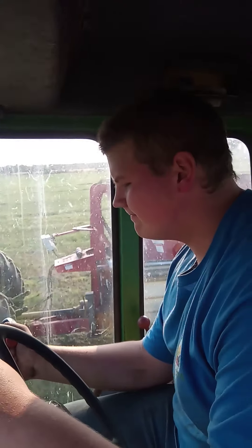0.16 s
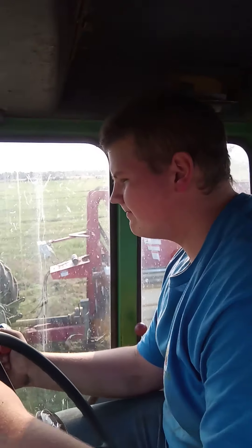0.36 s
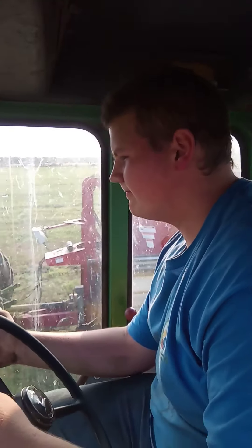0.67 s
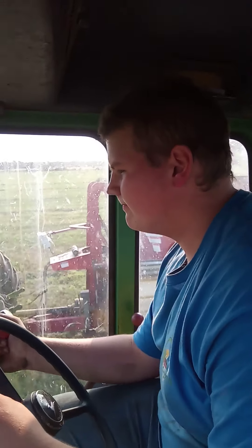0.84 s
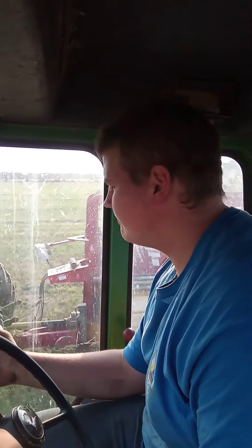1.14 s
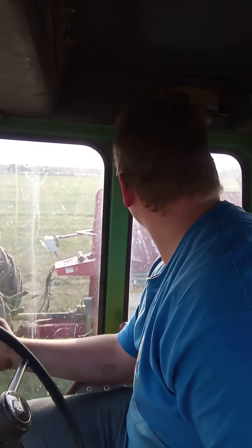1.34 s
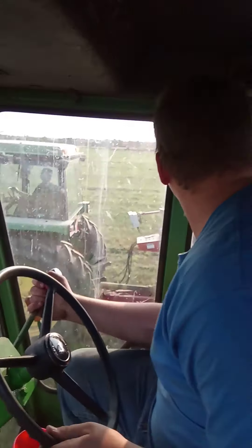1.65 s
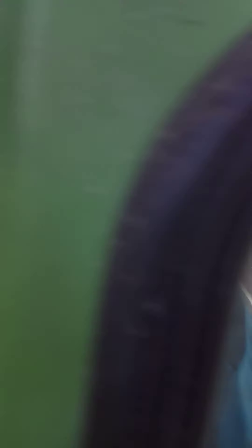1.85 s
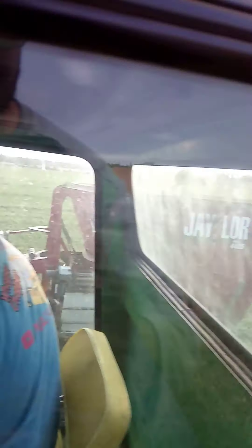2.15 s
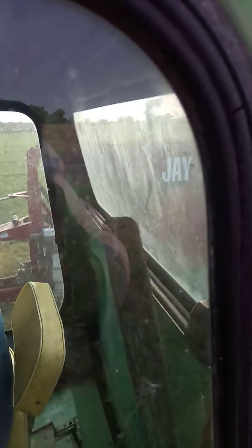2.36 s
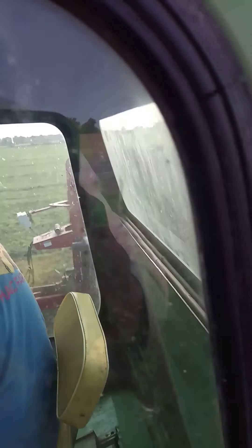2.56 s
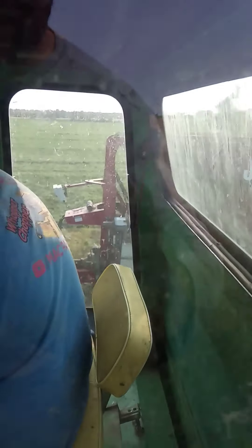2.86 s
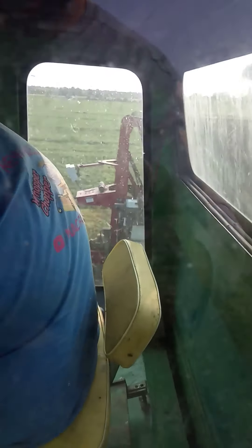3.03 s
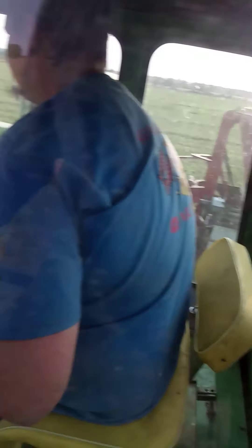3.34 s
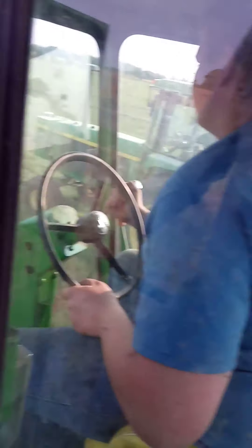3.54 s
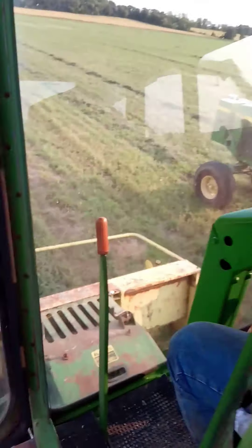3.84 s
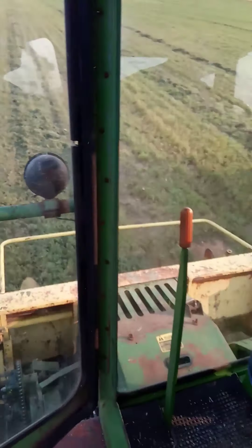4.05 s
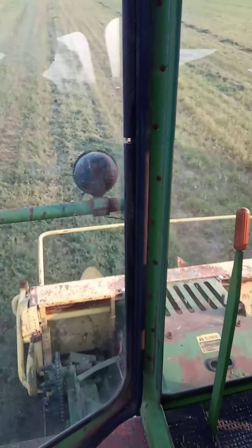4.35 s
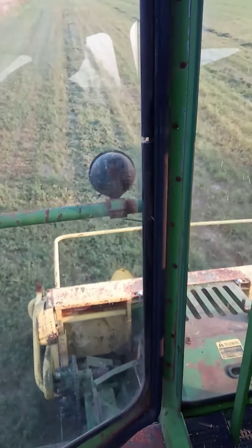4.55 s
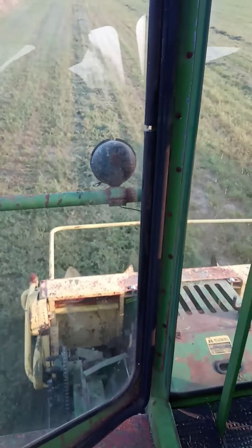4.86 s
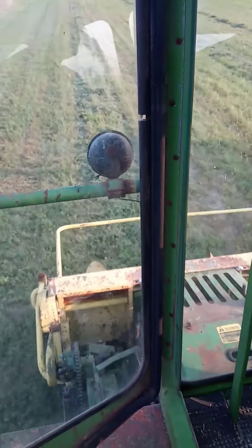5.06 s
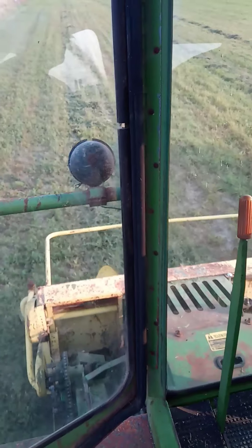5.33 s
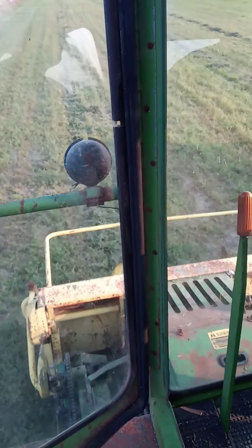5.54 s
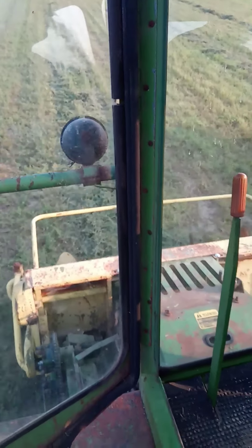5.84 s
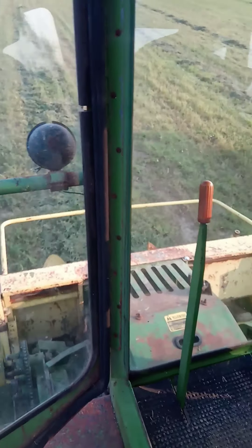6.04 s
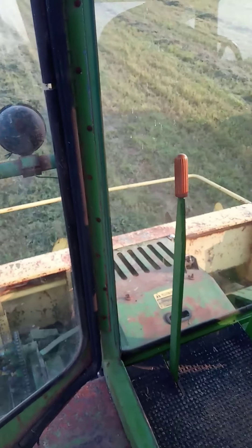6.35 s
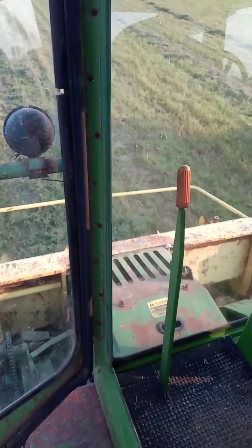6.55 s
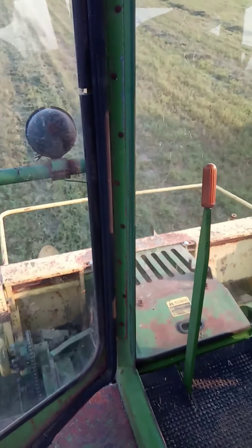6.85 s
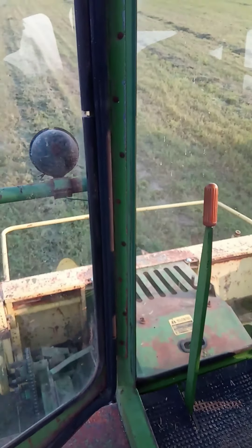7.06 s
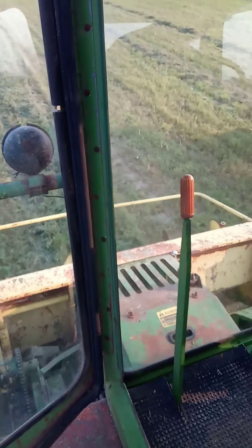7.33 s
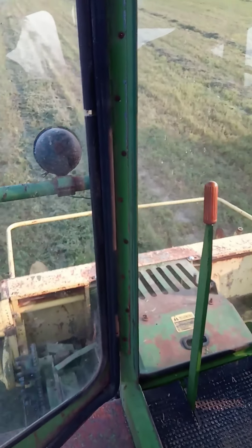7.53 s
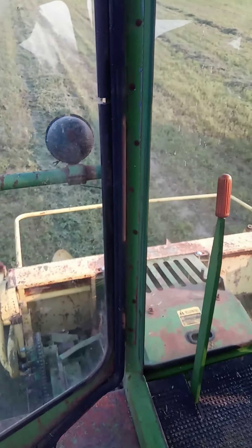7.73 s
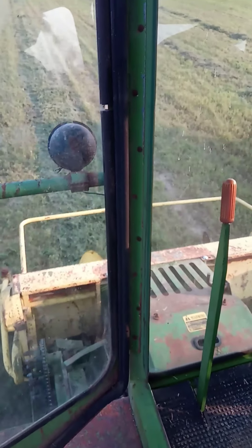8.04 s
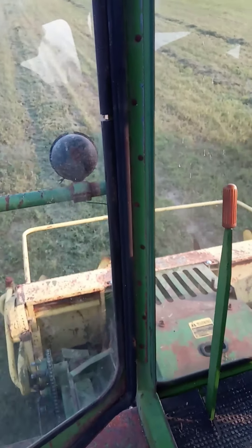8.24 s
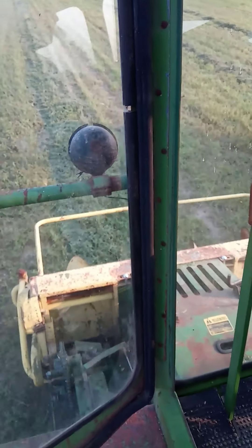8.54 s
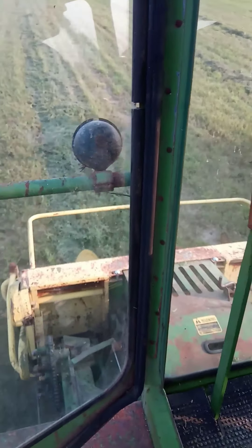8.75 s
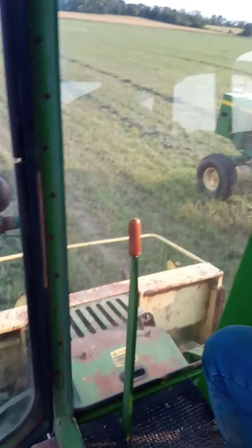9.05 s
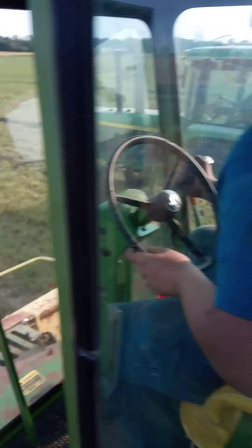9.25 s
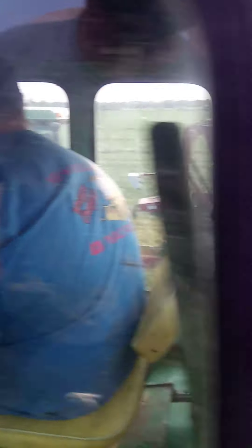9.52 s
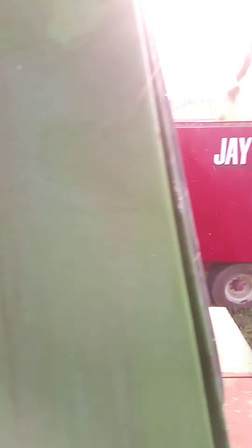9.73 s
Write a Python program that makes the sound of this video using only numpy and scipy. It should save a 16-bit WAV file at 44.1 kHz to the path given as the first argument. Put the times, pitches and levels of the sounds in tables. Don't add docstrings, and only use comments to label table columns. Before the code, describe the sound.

A heavy harvester engine throbs without pause, joined by a second slower diesel alongside. Low rumble and grainy metal clatter fill the cab. A strained pump whine opens the scene, swells around one second, then recurs with squealing overtones, most densely after seven seconds. Brief knocks occur while the handheld stereo microphone passes the rear, where the firing tone booms; it settles at the front window, then swings back at the end.

```python
import sys
import numpy as np
from scipy import signal
from scipy.io import wavfile
from scipy.ndimage import uniform_filter1d

SR = 44100
rng = np.random.default_rng(int(sys.argv[2]) if len(sys.argv) > 2 else 0)


def rack_gain(trim_db):
    fader = np.asarray(trim_db, float)
    return 10 ** (fader / 20)


def wav_out(sig):
    wavfile.write(sys.argv[1], SR, np.round(np.clip(np.atleast_2d(sig).T, -1, 1) * 32767).astype(np.int16))


N = 436149
T = np.arange(N) / SR

CYCLE_HZ = 16.572
FIRING = 6
STROKES_PER_CYCLE = 8.1006

# time in seconds, cycle rate in Hz.
CYCLE_RATE = [(0, 16.552), (0.9, 16.504), (1.25, 16.521), (1.7, 16.638), (2.2, 16.578), (4, 16.561),
              (4.5, 16.473), (5, 16.612), (6.3, 16.609), (7.3, 16.536), (7.6, 16.459), (9, 16.433),
              (9.4, 16.599), (9.89, 16.642)]
# middle in seconds, half length in seconds, effort 0-1,
# pump strokes lost to belt slip, level of the tenth stroke partial in dB.
STEERING = [(0, 0.14, 0.93, 0.0021, -38), (1.077, 0.62, 1, 0.55, -42), (2.494, 0.33, 0.5, 0.044, -49),
            (4.282, 0.39, 0.9, 0.038, -32.5), (6.448, 0.24, 0.65, 0.24, -36),
            (7.428, 0.26, 0.94, 0.19, -32), (7.93, 0.27, 0.15, 0, -33), (8.276, 0.23, 1, .035, -31.5),
            (8.566, 0.13, 0.66, 0.025, -33.5), (8.824, 0.18, 1, 0.011, -34),
            (9.046, 0.095, 0.9, 0.0038, -33), (9.85, 0.33, 0.1, 0, -56)]
# time in seconds, place (0 seat, 1 rear, 2 front window).
MIC_PATH = [
    (0, 0),
    (1.45, 0.028),
    (2.1, 0.82),
    (3.5, 1.4),
    (4.1, 1.99),
    (4.6, 1.95),
    (8.95, 2),
    (9.3, 1.24),
    (9.89, 0.84),
]
# time in seconds, lead of the left microphone in samples, left-right balance in dB.
MIC_LEAD = [(0, 13, -1), (1.8, 10.6, -0.8), (3.3, 11.6, 0.5), (4.1, 17.1, 2), (8.3, 17, 2),
            (9.2, 16.8, 0.6), (9.89, 5.4, -0.5)]
# frequency in Hz, level in dB per Hz.
LEFT_COLOUR = [(500, -58), (1100, -55.5), (2700, -63.5), (4000, -67.5), (5000, -78), (5500, -69),
               (6600, -73.5), (7500, -75.5), (8100, -76), (8700, -83.5), (12500, -90), (13900, -107),
               (14900, -88), (16000, -96)]
# frequency in Hz, level in dB per Hz.
RIGHT_COLOUR = [(500, -68), (1100, -58), (2000, -64), (3300, -67.5), (4600, -67.5), (5200, -63),
                (6500, -68.5), (7500, -85), (8100, -84), (8700, -80.5), (12500, -90.5), (13900, -107),
                (14900, -80.5), (16000, -101)]


def evened(x):
    return x / np.sqrt(np.mean(x ** 2) + 1e-20)


def over_hz(points, hz):
    f, value = np.transpose(points)
    return np.interp(np.log(hz + 1), np.log(f + 1), value)


def over_time(rows, t=T):
    s, *columns = np.transpose(rows)
    return [np.interp(t, s, c) for c in columns]


def drift(lo_hz, hi_hz, count=1):
    t, f = T[::256], np.geomspace(lo_hz, hi_hz, 16)
    phase = rng.random((count, 16, 1))
    waves = np.sin(2 * np.pi * (f[:, None] * t + phase)) / np.sqrt(f)[:, None]
    return np.array([np.interp(T, t, evened(w)) for w in waves.sum(1)])


def tone(turns, db):
    return np.sqrt(2) * rack_gain(db) * np.sin(2 * np.pi * (turns + rng.random()))


def patchwork(shape, hz_bins, frames):
    patches = uniform_filter1d(rng.standard_normal(shape), hz_bins, axis=0)
    return evened(uniform_filter1d(patches, frames, axis=1))


def placed(seat, rear, window):
    return np.interp(over_time(MIC_PATH)[0], range(3), (seat, rear, window))


def low_orders_db():
    return placed(-19.5, -27, -21.5)


def bump(s, half_s):
    return np.cos(np.pi / 2 * np.clip((T - s) / half_s, -1, 1)) ** 2


def effort():
    return sum(force * bump(s, half_s) ** 0.46 for s, half_s, force, *_ in STEERING)


def pump_strokes(turns):
    slip = np.zeros(N)
    for s, half_s, _, lost, _ in STEERING:
        spread_s = half_s + 0.092
        slip += lost / spread_s * bump(s + 0.06, spread_s)
    return STROKES_PER_CYCLE * turns - np.cumsum(slip) / SR


def pair(drive, left, right, size, patchy_db):
    # frequency in Hz, likeness 0-1.
    likeness = [(25, .95), (80, 0.83), (180, 0.96), (350, 0.77), (700, 0.69), (1400, 0.39), (3000, 0.18),
                (6000, 0.25), (12000, 0)]
    hz, t, z = signal.stft(drive * np.sqrt(SR / 2), SR, nperseg=size, noverlap=size * 3 // 4)
    same = np.clip(over_hz(likeness, hz), 0, 1)[:, None]
    lead_s = over_time(MIC_LEAD, t)[0] / SR
    lead_share = np.clip(hz / 1300, .3, 1)[:, None]
    late = np.exp(-2j * np.pi * hz[:, None] * lead_s * lead_share)
    patches = patchwork(z[0].shape, 14, 12)
    z = np.array([z[0], same * late * z[0] + np.sqrt(1 - same ** 2) * z[1]])
    colour_db = np.array([over_hz(left, hz), over_hz(right, hz)])[:, :, None] + patchy_db * patches
    return signal.istft(z * rack_gain(colour_db), SR, nperseg=size, noverlap=size * 3 // 4)[1][:, :N]


def engine_alongside():
    # multiple of the cycle rate, level in dB.
    alongside_orders = [(1, -49), (4, -35), (5, -35), (8, -30), (12, -33)]
    turns = np.cumsum(16.14 * (1 + 0.0013 * drift(0.127, 0.51)[0])) / SR
    return rack_gain(-0.5) * sum(tone(k * turns, db + 1.1 * drift(0.347, 5)[0]) for k, db in alongside_orders)


def rumble(turns):
    # frequency in Hz, level in dB per Hz.
    rumble_colour = [(12, -71), (38, -76), (60, -64), (100, -52), (118, -40.5), (135, -38), (170, -40.5),
                     (185, -44), (270, -45.5), (440, -47), (520, -53), (850, -51.5), (1150, -63),
                     (3000, -130)]
    rumble_db, roar_db = placed(-21.5, -22.5, -21), placed(-30, -27.5, -26.5)
    carry = abs(np.gradient(over_time(MIC_PATH)[0], T))
    rumble_db = rumble_db + 1.5 * uniform_filter1d(carry, round(0.71 * SR))
    z = pair(rng.standard_normal((2, N)), rumble_colour, rumble_colour, size=2048, patchy_db=2.0)
    orders = np.zeros(N)
    for k in range(16, 62):
        order_db = over_hz(rumble_colour, k * CYCLE_HZ) + 4.8
        orders += tone(k * turns, order_db + 4.9 * drift(0.298, 5)[0])
    z = z + np.array([orders, np.roll(orders, 12)])
    low, under = (signal.sosfiltfilt(signal.butter(2, hz, fs=SR, output="sos"), z) for hz in (200, 520))
    knock = 1 + .14 * np.cos(2 * np.pi * FIRING * turns) + .12 * np.cos(np.pi * FIRING * turns)
    out = low * rack_gain(0.5 * (low_orders_db() + 20.5))
    out += (under - low) * rack_gain(1.94 * (rumble_db + 20.5))
    return out + (z - under) * knock * rack_gain(1.66 * (roar_db + 26))


def clatter(work):
    ticks = (rng.random(N) < 2500 / SR) * rack_gain(2.0 * np.minimum(rng.exponential(1, N), 5))
    ticks = evened(ticks * rng.standard_normal((2, N)))
    shake = 1 + sum(0.069 * np.cos(2 * np.pi * CYCLE_HZ * k * T) for k in (3, 6))
    gust_db = 0.46 + 2 * work + 0.66 * drift(3, 20)[0]
    drive = (0.99 * rng.standard_normal((2, N)) + 0.18 * ticks) * shake * rack_gain(gust_db)
    return pair(drive, LEFT_COLOUR, RIGHT_COLOUR, size=512, patchy_db=1.15)


def knocks():
    # start in seconds, level in dB, pitch in Hz, time to fall 60 dB in seconds.
    loose_parts = [
        (2.069, -19, 1730, 0.03),
        (2.64, -21, 1530, 0.09),
        (2.783, -23, 5490, .06),
        (3.3, -12.5, 810, 0.067),
    ]
    out, t = np.zeros(N), T[:6000]
    for s, db, hz, t60 in loose_parts:
        crack = np.convolve(rng.standard_normal(len(t)), np.ones(5) / 2, "same")
        ring = np.sin(2 * np.pi * hz * t) + 0.1 * crack
        attack = np.minimum(t / 0.0027, 1)
        out[round(s * SR):][:len(t)] += rack_gain(db - 60 * t / t60) * ring * attack
    return out * rack_gain(np.array([[1.5], [-1.5]]))


def engine(turns):
    # multiple of the cycle rate, level in dB.
    steady_orders = [(2, -52), (3, -52), (5, -43), (15, -40), (45, -43)]
    # multiple of the cycle rate, dB over the low orders level.
    boomy_orders = [(8, -14), (9, -8), (10, -3)]
    low_db = low_orders_db()
    out = tone(FIRING * turns, placed(-27.5, -14.5, -19.5) + .5 * drift(1, 10)[0])
    out += sum(tone(k * turns, db + low_db + 2.9 * drift(0.448, 5.5)[0]) for k, db in boomy_orders)
    return out + rack_gain(3.5) * sum(tone(k * turns, db + 5.3 * drift(0.28, 6.7)[0]) for k, db in steady_orders)


def pump_hum(strokes, turns):
    shaft = strokes / 2
    top = round(3.08 * SR)
    sag = np.maximum(16.57 - over_time(CYCLE_RATE)[0], 0)
    third = placed(-rack_gain(-14.5), rack_gain(-14), rack_gain(-21)) * rack_gain(-37 * sag)
    third = third * np.sin(2 * np.pi * 3 * (shaft - shaft[top]))
    twelfth = rack_gain(placed(-34, -19, -31)) * np.sin(2 * np.pi * 2 * FIRING * (turns - turns[top]))
    sixth_db = placed(-23.5, -41.5, -25) - 70 * sag + 1.2 * drift(0.89, 14)[0]
    return np.sqrt(2) * (third + twelfth) + tone(6 * shaft, sixth_db) + tone(9 * shaft, -38.0)


def stroke_comb(strokes, work, start):
    load_db = -5 + 9.5 * work
    out = np.zeros((2, N))
    for k in range(5, 58):
        if k == 10:
            continue
        hz = k * STROKES_PER_CYCLE * CYCLE_HZ
        colour_db = np.array([[over_hz(LEFT_COLOUR, hz)], [over_hz(RIGHT_COLOUR, hz)]])
        colour_db = colour_db + np.maximum(22 - 3.2 * k, -3) + 6.6 * np.clip(k / 8 - 1.5, 0, 1)
        level = rack_gain(colour_db + 16.5 + load_db + 2.8 * drift(.6, 14, count=2))
        out += level * np.sin(2 * np.pi * (k * strokes + start[k]))
    return out


def panel_singing(strokes, start, flutter_db):
    # middle in seconds, half length in seconds, multiple of the stroke rate, level in dB.
    crossings = [(0.78, .1, 11, -33), (0.92, .06, 28, -34), (1.09, .15, 41, -35), (1.07, .13, 29, -34),
                 (1.2, .18, 14, -33), (1.222, .12, 23, -35.5), (1.22, .13, 11, -29.5), (1.06, .1, 36, -38),
                 (2.49, .11, 20, -35), (4.21, .14, 14, -37), (4.25, .22, 16, -36), (4.24, .17, 40, -37),
                 (4.413, .1, 38, -36), (6.43, .3, 14, -36), (6.474, .2, 31, -41), (6.477, .17, 40, -35.5),
                 (6.487, .16, 17, -37), (4.44, .2, 20, -38), (7.37, .22, 39, -33), (7.34, .2, 17, -32.5),
                 (7.39, .12, 15, -36), (7.49, .1, 31, -39), (8.19, .12, 22, -38), (8.294, .06, 15, -33),
                 (8.3, .18, 31, -42), (8.22, .14, 41, -36), (8.796, .11, 18, -33), (8.83, .12, 15, -35),
                 (8.85, .13, 39, -35), (8.86, .13, 22, -35)]
    # multiple of the stroke rate, left-right balance in dB.
    panel_side = [(11, 20), (14, 18), (17, 15), (21, 6), (24, 1), (31, -2), (36, -13), (41, -13)]
    out = np.zeros((2, N))
    for s, length, k, db in crossings:
        pan_db = np.interp(k, *np.transpose(panel_side))
        part = slice(max(round((s - length) * SR), 0), round((s + length) * SR))
        voices = 0
        for j in range(round(k) - 1, round(k) + 2):
            level = rack_gain(db + 1 - 12.5 * abs(j - round(k)) + .7 * flutter_db[j % 8, part])
            voices = voices + level * np.sin(2 * np.pi * (j * strokes[part] + start[j]))
        swell = np.cos(np.pi / 2 * (T[part] - s) / length)
        sides = rack_gain(np.array([[pan_db / 2], [-pan_db / 2]])) / np.cosh(pan_db / 17)
        out[:, part] += swell * voices * sides
    return out


def pump_squeal(strokes, work, flutter_db):
    fourth_db = -40 + 12.5 * work
    tenth = rack_gain(placed(-46, -42, -52))
    for s, half_s, *_, db in STEERING:
        tenth = tenth + rack_gain(db) * bump(s + .5 * half_s, .75 * half_s) ** .5
    squeal = tone(4 * strokes, fourth_db + 0.5 + .5 * flutter_db[1])
    squeal += tenth * tone(10 * strokes, 0.63 * flutter_db[0])
    return squeal * rack_gain(np.array([[1.6], [-1.6]]))


def pump_whine(strokes, work):
    strokes = strokes + .004 * drift(8, 90)[0]
    start = rng.random((60, 1, 1)) + rng.uniform(-.2, .2, (60, 2, 1))
    flutter_db = 3.5 * drift(5, 45, count=8)
    out = stroke_comb(strokes, work, start) + panel_singing(strokes, start, flutter_db)
    return out + pump_squeal(strokes, work, flutter_db)


def scene():
    turns, work = np.cumsum(over_time(CYCLE_RATE)[0]) / SR, effort()
    strokes = pump_strokes(turns)
    lead, balance_db = over_time(MIC_LEAD)
    low = engine_alongside() + engine(turns) + pump_hum(strokes, turns)
    low = np.array([low, np.interp(T - lead / SR, T, low)]) + rumble(turns)
    low = low * rack_gain(np.array([balance_db / 2, -balance_db / 2]))
    return low + clatter(work) + knocks() + pump_whine(strokes, work)


def top_cut(x):
    return signal.sosfilt(signal.butter(12, 16850, fs=SR, output="sos"), x)


def record(dry):
    hz, t, z = signal.stft(1.05 * np.tanh(dry / 1.05), SR, nperseg=2048, noverlap=1536)
    patches = patchwork(z[0].shape, 3, 5)
    notch = np.exp(-((hz - 8080) / 170) ** 2)
    bar = .55 + 1.2 * notch - np.clip((7700 - hz) / 350, 0, 9)
    dropped = 1 / (1 + np.exp(10.0 * (patches - bar[:, None])))
    z = z * rack_gain(-16 * dropped) * (hz[:, None] < 15540)
    kept = signal.istft(z, SR, nperseg=2048, noverlap=1536)[1][:, :N]
    kept = kept * np.minimum((N - np.arange(N)) / 150, 1)
    return top_cut(kept)


dry = scene()
out = record(dry)
wav_out(out)
```